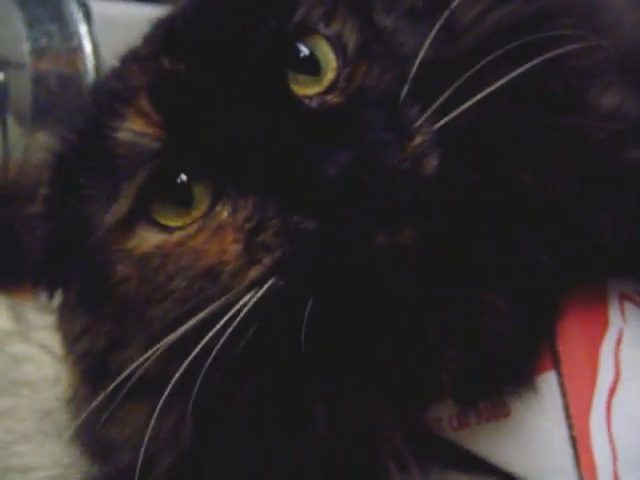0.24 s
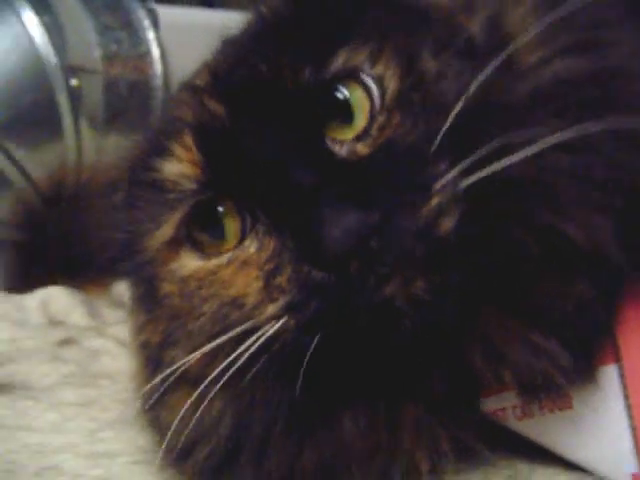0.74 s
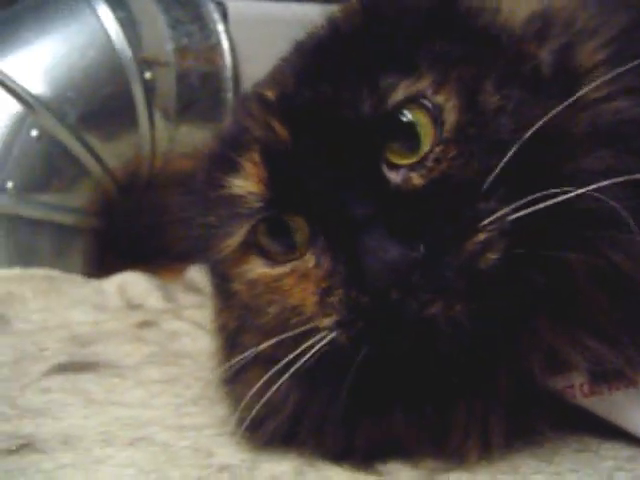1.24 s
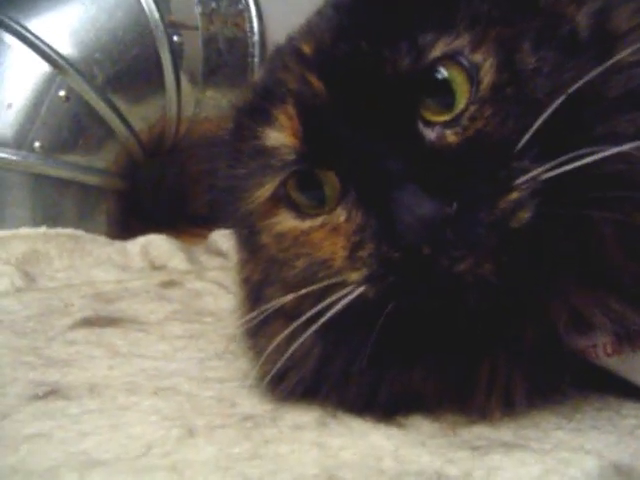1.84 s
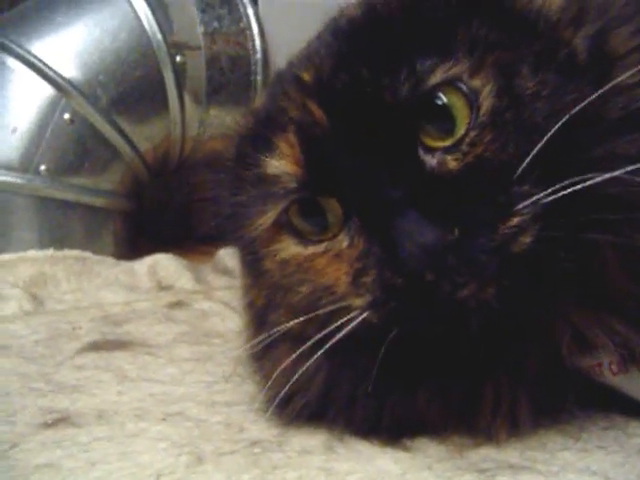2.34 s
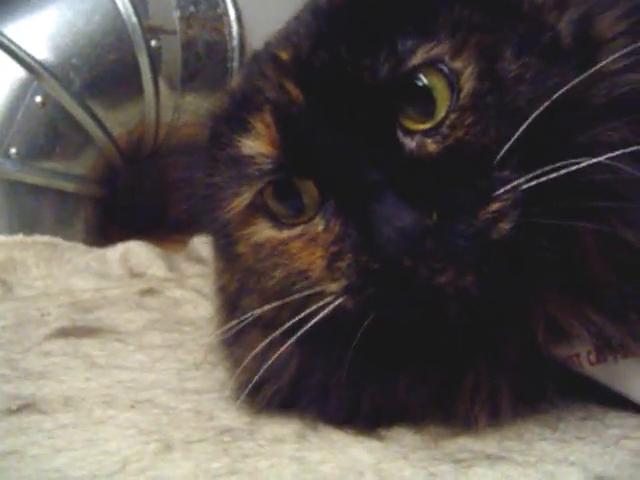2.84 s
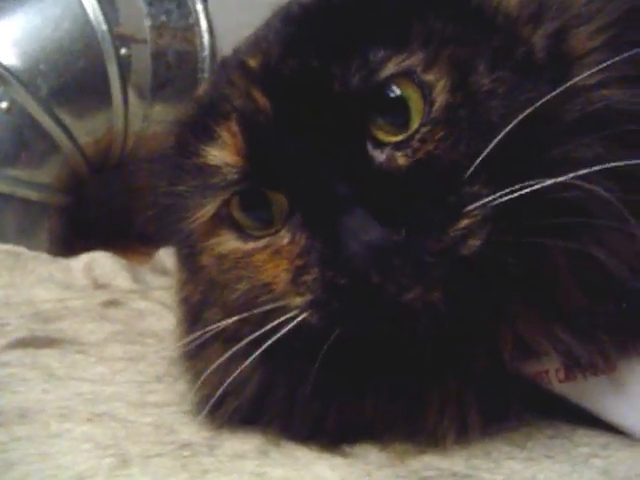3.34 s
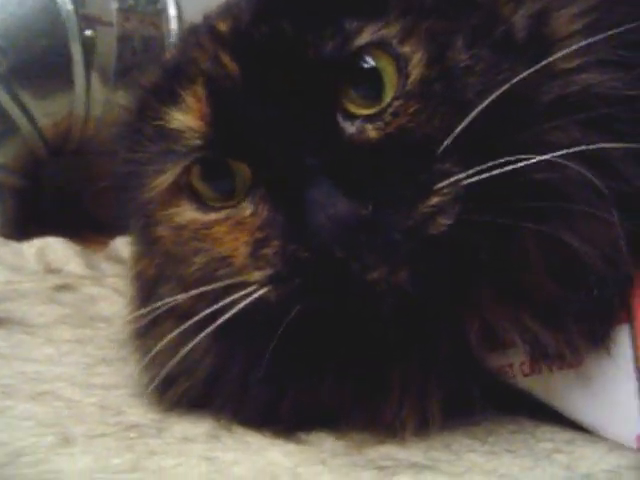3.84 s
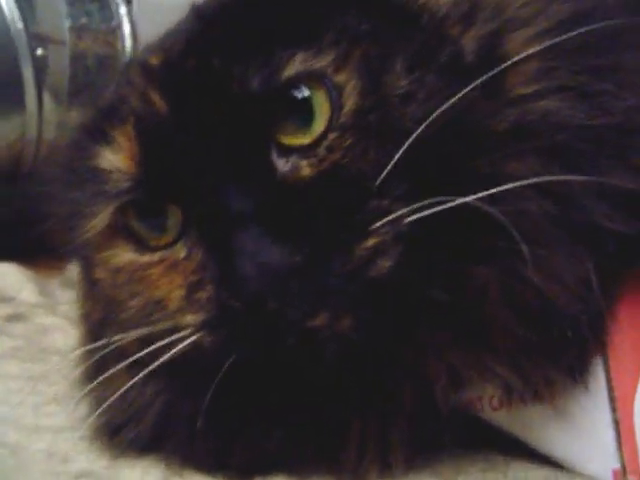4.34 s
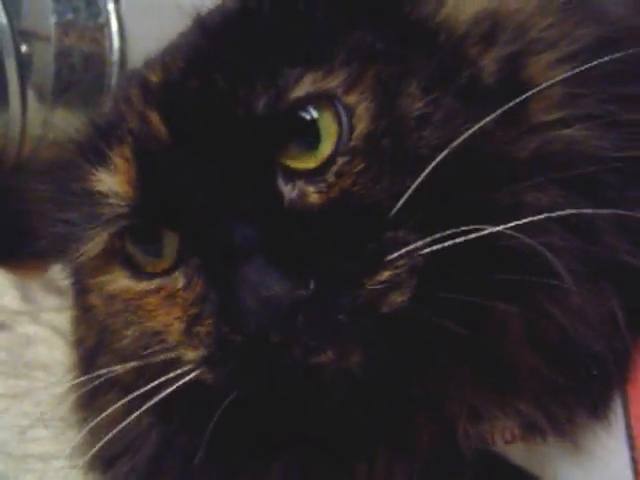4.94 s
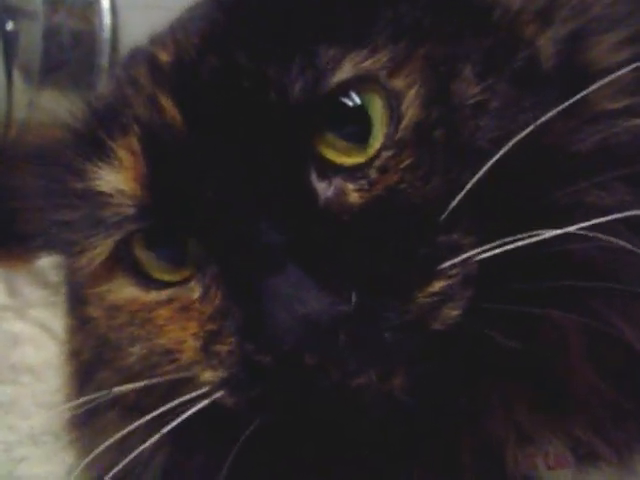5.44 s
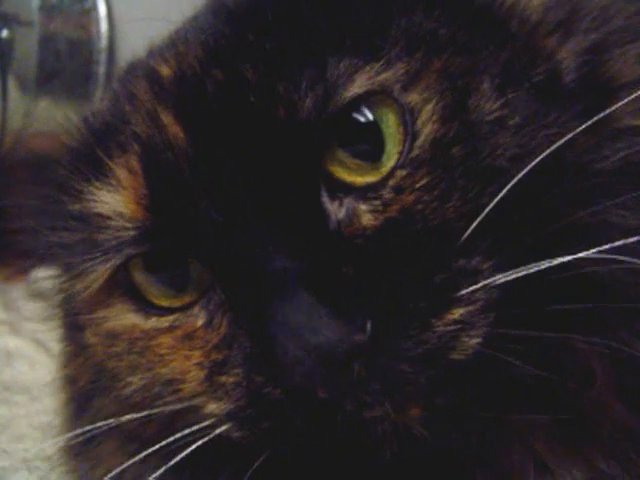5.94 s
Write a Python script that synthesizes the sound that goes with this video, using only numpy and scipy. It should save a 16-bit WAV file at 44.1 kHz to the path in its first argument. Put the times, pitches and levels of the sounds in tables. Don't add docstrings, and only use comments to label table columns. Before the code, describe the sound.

A cat close to the microphone gives two long, fluttering growling yowls with its mouth nearly shut, separated by rustling and a soft thump.

```python
import sys
import numpy as np
from scipy import signal
from scipy.fft import rfft, irfft, next_fast_len
from scipy.io import wavfile
from scipy.ndimage import uniform_filter1d, map_coordinates

SR = 44100
rng = np.random.default_rng(int(sys.argv[2]) if len(sys.argv) > 2 else 0)


def linear_from_db(decibels):
    return 10 ** (np.asarray(decibels, float) / 20)


def pcm_store(signal):
    levels = np.round(np.clip(np.atleast_2d(signal), -1, 1) * 32767)
    wavfile.write(sys.argv[1], SR, levels.astype(np.int16).T)


N = 272538
T = np.arange(N) / SR


def evened(x):
    return x / np.sqrt(np.mean(x ** 2) + 1e-20)


def curve(rows, column):
    rows = np.array(rows)
    return np.interp(T, rows[:, 0], rows[:, column])


def colour(x, points):
    hz, db = np.transpose(points)
    grid = np.abs(np.fft.fftfreq(8192, 1 / SR))
    log_gain = np.log(linear_from_db(np.interp(np.log(grid + 1), np.log(hz + 1), db)))
    taps = np.fft.ifft(np.exp(np.conj(signal.hilbert(log_gain)))).real[:4096]
    return signal.oaconvolve(x, taps)[:N]


def resonate(x, hz, width):
    turn = np.exp(2j * np.pi * hz * T)
    r = np.exp(-np.pi * width / SR)
    return 2 * (turn * signal.lfilter([(1 - r) ** 2], [1, -2 * r, r * r], x / turn)).real


def drift(hz):
    return evened(signal.sosfilt(signal.butter(2, hz, fs=SR, output="sos"), rng.standard_normal(N)))


def swell(s, db, rise_s, fall):
    return linear_from_db(db - np.where(T < s, 30 * (s - T) / rise_s, fall * (T - s)))


def sine(hz, turns=0):
    return np.sqrt(2) * np.sin(2 * np.pi * (hz * T + turns))


def background():
    # pitch_hz, level_db
    hiss_colour = [(25, -19), (70, -16), (110, -17), (170, -11.5), (400, -12.5), (650, -10), (1100, -18),
                   (2000, -23), (5000, -27), (9500, -28.5)]
    # multiple of the mains pitch, level_db
    hum_lines = [(2, -58), (3, -73), (4, -49), (6, -64.5), (8, -61), (9, -59), (10, -65), (12, -66.5),
                 (14, -70), (16, -67)]
    # pitch_hz, width_hz, level_db
    drone_bands = [(95.3, 11, -59.5), (126.2, 11, -59), (256.8, 36, -56), (360, 36, -58),
                   (407.4, 12.4, -59), (427, 44, -63), (687, 93, -65.5)]
    # pitch_hz, level_db
    clock_lines = [(2000, -73), (3000, -79), (4000, -78.5), (5000, -81), (6000, -79.5), (7000, -87),
                   (8000, -79)]
    mains_hz = 60
    hiss = linear_from_db(-49.5 + 0.42 * drift(18)) * evened(colour(rng.standard_normal(N), hiss_colour))
    hum = sum(linear_from_db(db + 0.46 * drift(8.7)) * sine(k * mains_hz, rng.random()) for k, db in hum_lines)
    drone = sum(linear_from_db(db) * evened(resonate(rng.standard_normal(N), hz, width)) for hz, width, db in drone_bands)
    clock = sum(linear_from_db(db) * sine(hz) for hz, db in clock_lines)
    return hiss + hum + drone + clock


def room(x):
    level_db, t60_s = -16, .3
    t = T[:SR // 2]
    sparse = rng.choice([-1., 1.], len(t)) * (rng.random(len(t)) < .05)
    taps = sparse * linear_from_db(-60 * t / t60_s) * (t > .004)
    return linear_from_db(level_db) * signal.oaconvolve(x, taps / np.linalg.norm(taps))[:N]


def rustle():
    # peak_s, level_db, rise_s, fall_db_per_s
    slides = [
        (1.38, -46, .012, 190),
        (2.132, -46.5, .01, 380),
        (2.356, -49.5, .12, 900.5),
        (2.746, -41, 0.031, 230),
        (2.891, -49.5, 0.32, 400),
        (2.909, -43.5, 0.046, 32),
        (3.028, -53, 0.012, 300),
        (4.382, -57, 0.19, 900),
        (4.41, -54, .015, 142),
    ]
    # pitch_hz, level_db
    cloth = [(300, -14), (800, -4.5), (1550, -3.5), (2400, -7), (5800, -13.5), (10000, -21.5)]
    stop_s, stop_db_per_s = 3.03, 280
    level = 0
    for row in slides:
        stopping = stop_db_per_s * np.maximum(T - stop_s, 0) * (row[0] < stop_s)
        level = level + swell(*row) * linear_from_db(-stopping)
    grains = rng.standard_normal(N) * linear_from_db(2.8 * drift(200))
    return level * evened(colour(grains, cloth))


def thump():
    # peak_s, level_db, rise_s, fall_db_per_s
    thuds = [
        (2.996, -32, 0.013, 190),
        (3.03, -30.5, 0.01, 164),
        (3.12, -57, 0.022, 52),
    ]
    # pitch_hz, level_db
    padding = [(40, -59), (90, -13.5), (200, -4.5), (270, -3.5), (330, -28), (440, 0), (600, -17.5),
               (1000, -18.5), (2500, -46)]
    uneven = rng.standard_normal(N) * linear_from_db(0.63 * drift(64))
    return evened(colour(uneven, padding)) * sum(swell(*row) for row in thuds)


def knocks_and_ticks():
    # start_s, peak_db, pitch_hz
    ticks = [(1.38, -37, 1800), (1.4206, -37, 2370), (1.453, -32, 2470), (1.765, -33.5, 1780),
             (2.1288, -37, 2000), (2.3261, -43, 2645), (2.7275, -28, 1500), (2.7444, -27, 1625),
             (2.8972, -28, 1554), (2.902, -33, 1500), (2.9076, -33, 1590), (2.9163, -34, 1517),
             (3.03, -36, 1250), (3.031, -34, 2100), (3.3968, -37.5, 2030), (4.344, -38, 4220),
             (4.372, -43, 3950), (4.3984, -40, 3880), (4.4099, -39, 3810), (4.415, -38, 4100),
             (4.4214, -51, 2010), (4.536, -37.5, 1566)]
    # start_s, peak_db, pitch_hz, ring_cycles
    knocks = [(0.046, -36.5, 462, 22), (.305, -40, 442, 14), (.34, -38.5, 445, 19), (2.992, -33, 443, 2.5),
              (3.0229, -31, 298, 2.5), (3.0274, -20.5, 322, 3.7), (3.046, -32, 400, 3.5),
              (3.069, -29, 260, 3), (3.629, -38.5, 444, 21), (4.43, -34, 350, 7.3)]
    tick_ring_s = .0028
    out = np.zeros(N)
    for s, db, hz, cycles in [(*row, tick_ring_s * row[-1]) for row in ticks] + list(knocks):
        u = T[:2000] * hz
        part = out[round(s * SR):][:2000]
        part += linear_from_db(db) * np.sin(2 * np.pi * u) * np.exp(-3 * u / max(cycles, 1)) * np.minimum(6.2 * u, 1)
    return out


def surges():
    # slip_s, build_up_s, level_db, pitch_hz
    pushes = [(1.74, 0.0987, .5, 15.82), (1.915, 0.038, 1, 11.4), (2.02, 0.0603, 5.5, 26.74),
              (2.17, .11, 2.5, 42.8), (2.305, .11, 1.5, 36.3), (2.56, 0.061, 0.5, 8.2),
              (5.19, 0.077, 2.5, 8.9), (5.24, 0.04, 3, 6), (5.415, 0.0887, 3, 23.5), (5.625, .17, .5, 13.9),
              (5.825, 0.22, 1, 11.2), (5.94, 0.0764, 2, 12.1), (6.054, 0.055, 1, 10), (6.115, .13, 1, 21)]
    slip_s, full_at = .02, .65
    shape = np.array([np.interp(T, [s - up, s, s + slip_s], [0, 1, 0]) for s, up, *_ in pushes])
    db, hz = np.array(pushes)[:, 2:].T
    return db @ np.minimum(shape / full_at, 1), hz @ shape


def fold_motion(hz, flutter_hz, depth, rough):
    flutter = 2 * np.pi * np.cumsum(flutter_hz * (1 + .14 * rough * drift(25))) / SR
    depth = np.clip(depth * (1 + .5 * rough * drift(30)), 0, 1.5)
    swing = np.sin(flutter) - .35 * np.sin(2 * flutter) + .15 * np.sin(3 * flutter)
    phase = 2 * np.pi * np.cumsum(hz * (1 + .09 * rough * drift(70))) / SR + .9 * depth * swing
    strength = np.exp(.48 * depth * np.cos(flutter) + .36 * rough * drift(150))
    return phase, strength


def head(x):
    # pitch_hz, level_db
    muffle = [(60, -16.5), (140, -19.5), (195, -8), (260, -7.5), (345, 3), (385, 2), (447, 1.5),
              (600, -0.5), (660, -1.5), (750, -4.5), (812, -11), (880, -5.5), (1250, -19.5), (1800, -43.5)]
    # pitch_hz, turn_radians
    lead = [(600, 0), (900, 1.6)]
    # pitch_hz, width_hz, level_db
    cavities = [(244, 100, -5.5), (437.4, 48, -1.5), (734, 69, -4)]
    size = next_fast_len(N)
    hz = np.fft.rfftfreq(size, 1 / SR)
    muffle_hz, muffle_db = np.transpose(muffle)
    gain = linear_from_db(np.interp(np.log(hz + 1), np.log(muffle_hz), muffle_db))
    x = irfft(rfft(x, size) * gain * np.exp(1j * np.interp(hz, *np.transpose(lead))), size)[:N]
    return x + sum(linear_from_db(db) * resonate(x, f, width) for f, width, db in cavities)


def voiced(phase, strength, pressed_db, since):
    folds_db = [-3, -3.5, -10.5, -18, -19, -35, -27.5, -40, -48, -74]
    loose = np.exp(-since / .072)
    folds = -sum(linear_from_db(db + pressed_db * (k - 1)) * np.cos(k * phase) for k, db in enumerate(folds_db, 1))
    folds -= (linear_from_db(8 * loose) - 1) * linear_from_db(folds_db[0]) * np.cos(phase)
    voice = head(strength * folds)
    power = uniform_filter1d(uniform_filter1d(voice ** 2, 1600), 1600)
    voice /= np.sqrt(np.abs(power) + 1e-12)
    closing = strength * np.real(1 / (1 - .9 * np.exp(1j * phase)))
    sinus_db = -30 + 8 * loose - 11.3 * (T > 5.47 - 0.036)
    return voice + linear_from_db(sinus_db) * resonate(closing, 2406, 144)


def yowl(rows, ends, breath_db, attack_db):
    # pitch_hz, width_hz, level_db
    nose = [(1134, 260, 0.5), (2450, 760, -10), (6330, 1200, -18)]
    start = rows[0][0]
    end, steady, shaky = ends
    hz, level_db, flutter_hz, depth = (curve(rows, k) for k in range(1, 5))
    push_db, push_hz = surges()
    release_s = 0.058
    since = np.maximum(T - start, 0)
    slack = np.clip((T - end) / release_s, 0, 1)
    attack = np.exp(-since / 0.062)

    pressed_db = 0.96 - np.log2(hz / 307) - 0.53 * push_db - 19 * slack - 2.5 * attack
    rough = steady + shaky * depth + .2 * np.exp(-since / .2)
    rough = rough * (1 - .07 * push_db) * (1 - slack) ** .5
    depth = (depth - 0.062 * push_db) * np.clip((end + .03 - T) / .06, 0, 1)
    hz = (hz + push_hz) * (1 + 0.293 * slack ** 1.5)
    level_db = level_db + attack_db * attack + push_db - 17 * slack ** 1.5
    breath_db = breath_db - 0.92 * push_db + 9.5 * np.exp(-since / 0.1)

    phase, strength = fold_motion(hz, flutter_hz, depth, rough)
    voice = voiced(phase, strength, pressed_db, since)
    puffs = strength * (1 + 0.97 * np.cos(phase)) * rng.standard_normal(N)
    breath = evened(sum(linear_from_db(db) * resonate(puffs, f, width) for f, width, db in nose))
    wheeze = swell(5.47, -61, 0.036, .7) * evened(resonate(puffs, 3850, 350))
    opening = np.clip((T - start + .004) / .008, 0, 1)
    closing = np.clip((end + release_s + .012 - T) / .015, 0, 1)
    return opening * closing * (linear_from_db(level_db) * (voice + linear_from_db(breath_db) * breath) + wheeze)


def scene():
    # time_s, pitch_hz, level_db, flutter_hz, flutter_depth (0 none, about 1 strong)
    yowls = [
        [(1.208, 111.2, -26, 58.68, 0.58), (1.417, 141.3, -18.5, 58.4, 0.3), (1.505, 220, -19, 52.46, .48),
         (1.61, 235.7, -21, 52.93, 0.5), (1.806, 283.3, -24, 51, 0.48), (1.95, 340, -23, 50.6, 0.46),
         (2.2, 294.7, -24, 49.7, 0.68), (2.335, 252.6, -22.5, 50.12, 0.86), (2.77, 173.3, -19, 53.26, 1.11)],
        [(4.624, 124, -26.5, 62.03, 0.64), (4.71, 132.3, -20, 62.7, 0.44), (4.814, 219.8, -18, 56.5, 0.36),
         (4.914, 298, -23, 57.6, 0.14), (5.024, 330, -22, 54.5, 0.32), (5.2, 343.9, -19.5, 55.46, 0.27),
         (5.45, 315.5, -21, 54.87, 0.31), (5.87, 266.2, -19.5, 54.22, .52), (6.17, 242.3, -18.5, 53.47, .62)],
    ]
    # release_s, roughness when steady, roughness per flutter depth
    ends = [
        (2.81, .32, .15),
        (6.5, -.05, .55),
    ]
    breaths_db = [-32, -35]
    attacks_db = [-15.5, -3.5]
    near = rustle() + thump() + knocks_and_ticks()
    near += sum(yowl(*call) for call in zip(yowls, ends, breaths_db, attacks_db))
    return (near + room(near) + background())[None]


def roll_off(x):
    return signal.sosfilt(signal.butter(12, 16880, fs=SR, output="sos"), x)


def record(dry):
    camera_rate, camera_edge_hz, upper_edge_hz = 32000, 10000, 15740
    limited = signal.oaconvolve(dry[0], signal.firwin(401, camera_edge_hz, fs=SR), "same")
    held = np.floor(np.arange(N) * camera_rate / SR) * SR / camera_rate
    x = map_coordinates(limited, [held], order=3, mode="nearest")
    x = signal.oaconvolve(x, signal.firwin(1201, upper_edge_hz, window=("kaiser", 10), fs=SR), "same")
    return roll_off(x[None])


dry = scene()
out = record(dry)
pcm_store(out)
```